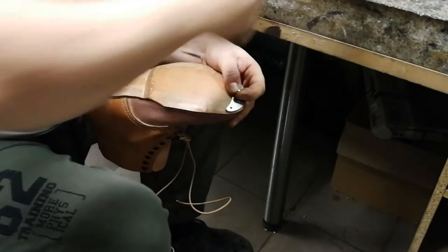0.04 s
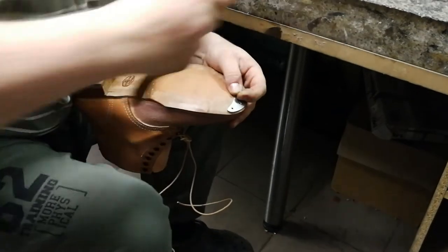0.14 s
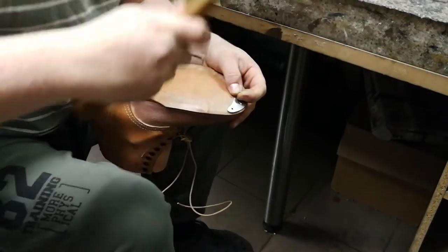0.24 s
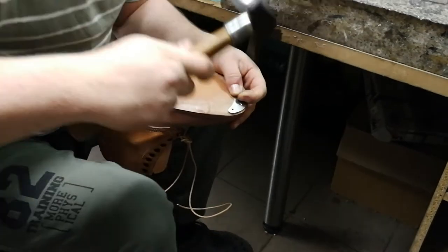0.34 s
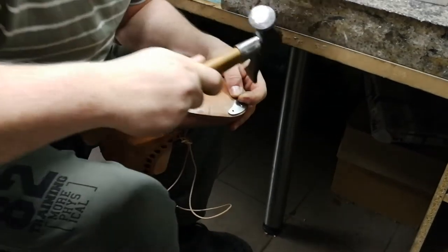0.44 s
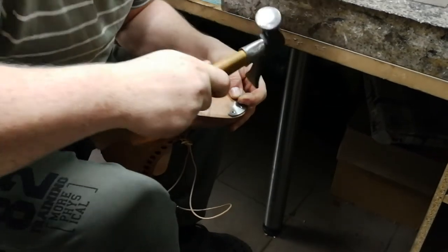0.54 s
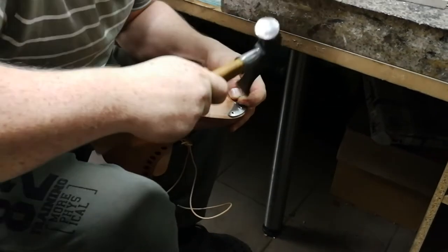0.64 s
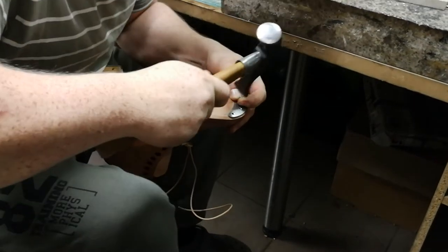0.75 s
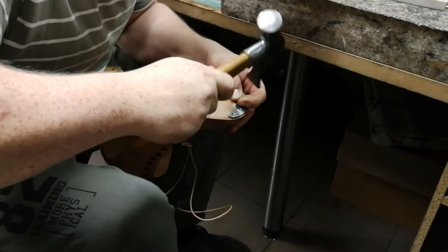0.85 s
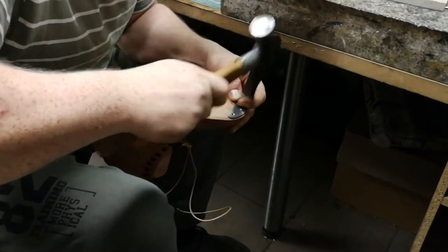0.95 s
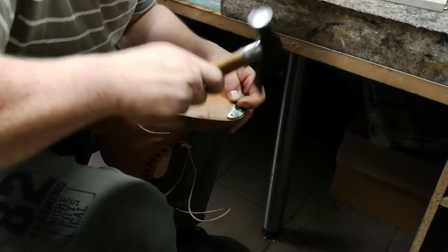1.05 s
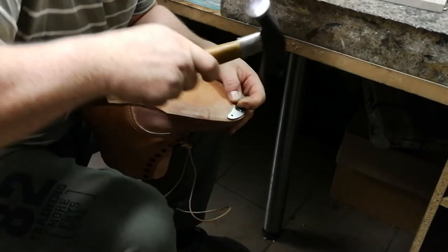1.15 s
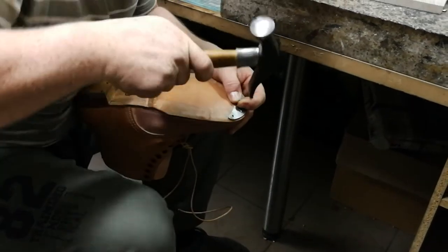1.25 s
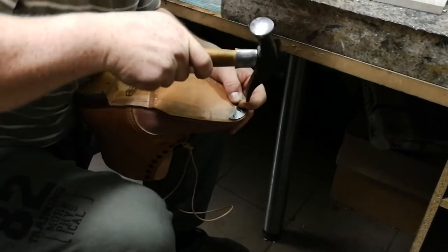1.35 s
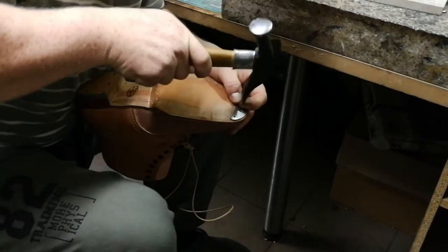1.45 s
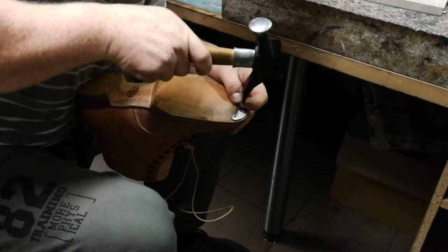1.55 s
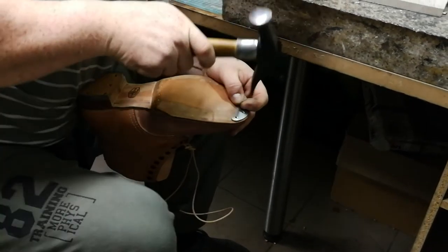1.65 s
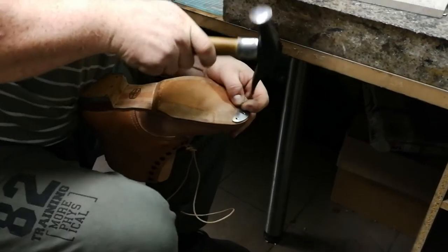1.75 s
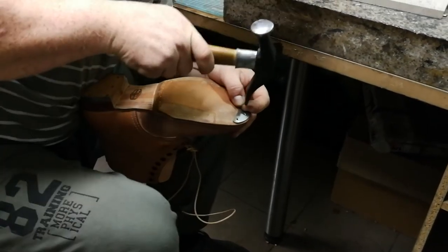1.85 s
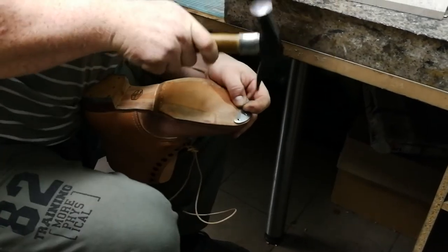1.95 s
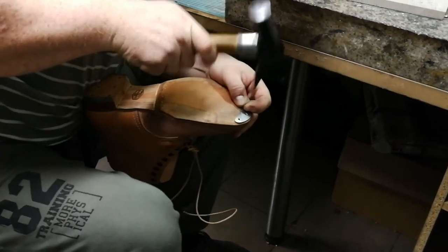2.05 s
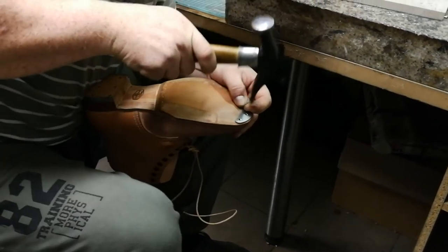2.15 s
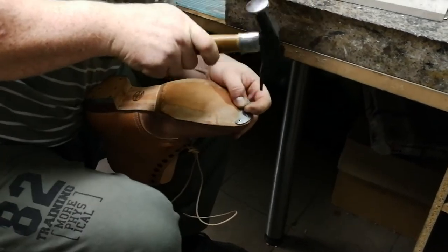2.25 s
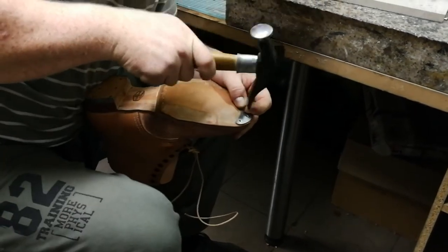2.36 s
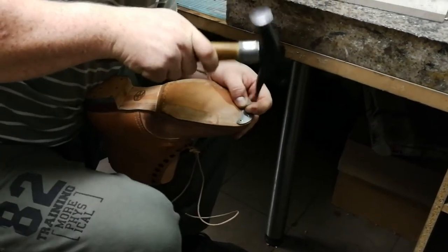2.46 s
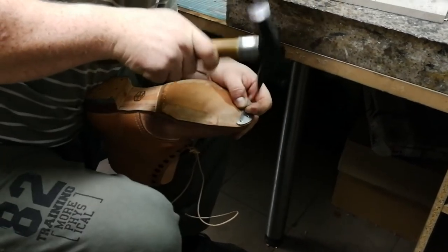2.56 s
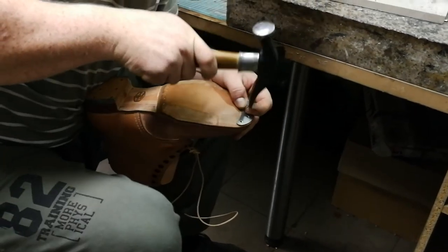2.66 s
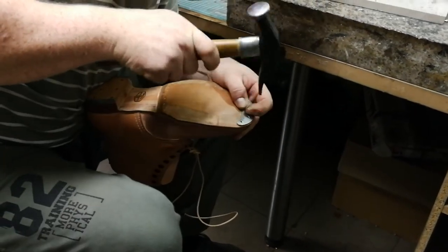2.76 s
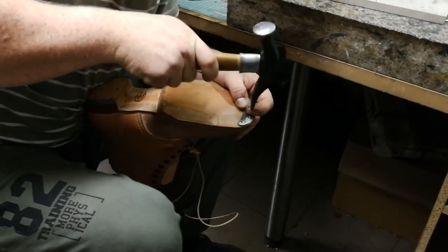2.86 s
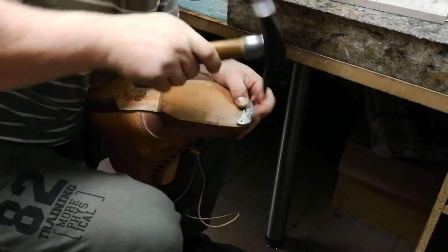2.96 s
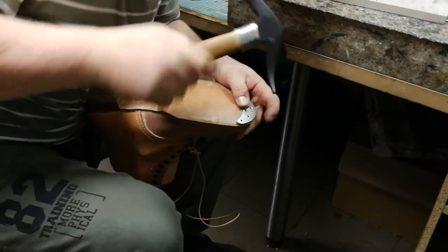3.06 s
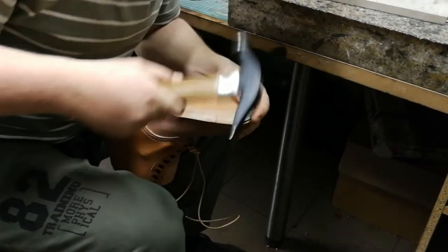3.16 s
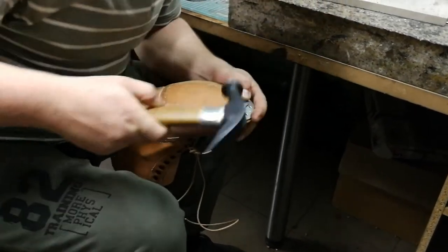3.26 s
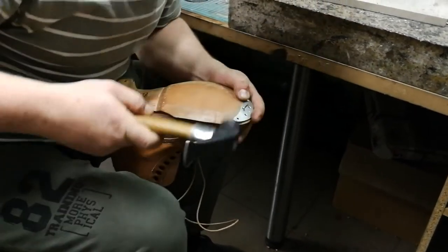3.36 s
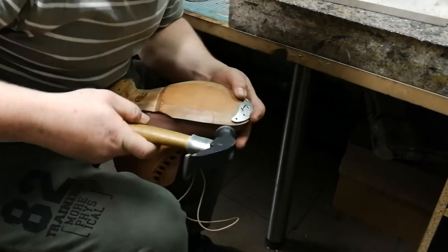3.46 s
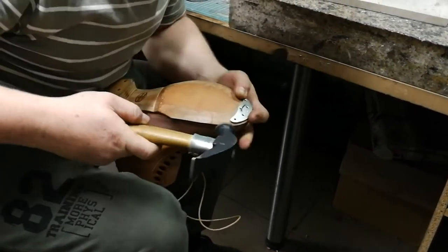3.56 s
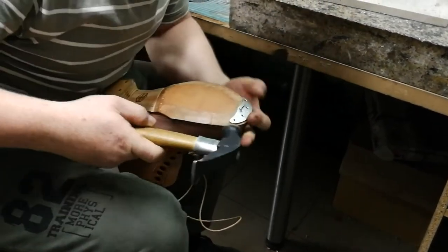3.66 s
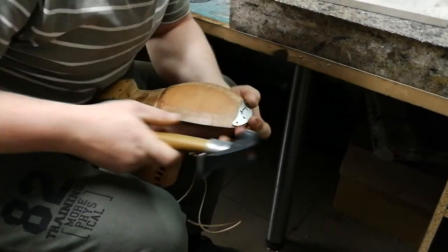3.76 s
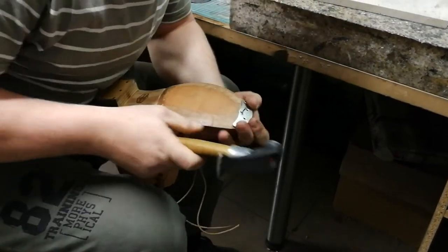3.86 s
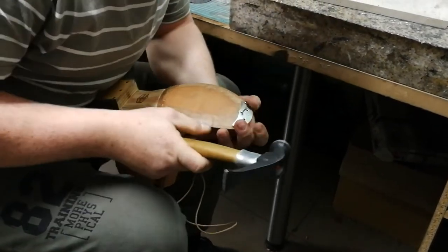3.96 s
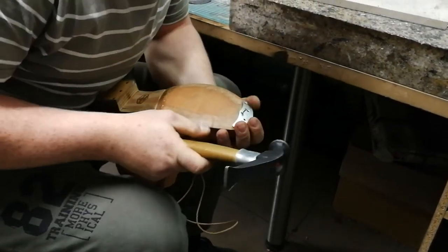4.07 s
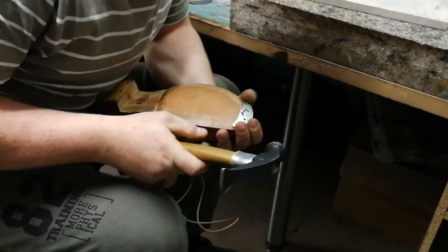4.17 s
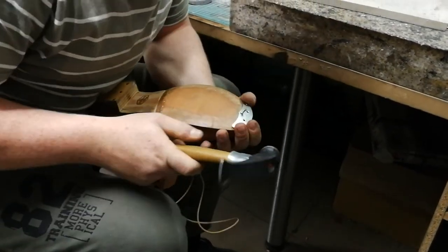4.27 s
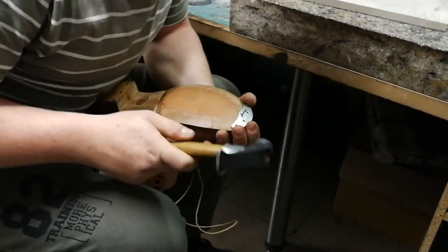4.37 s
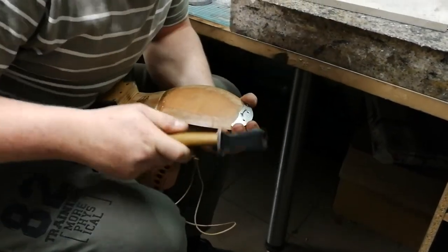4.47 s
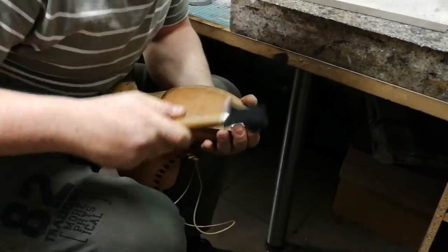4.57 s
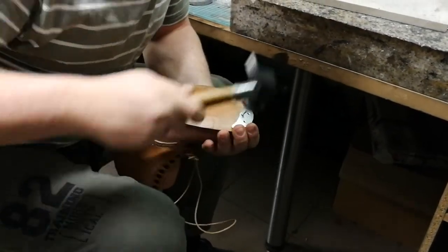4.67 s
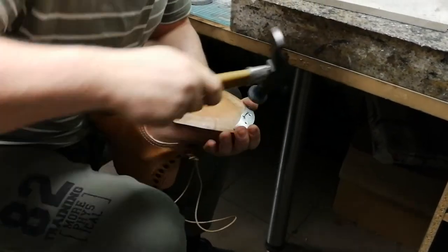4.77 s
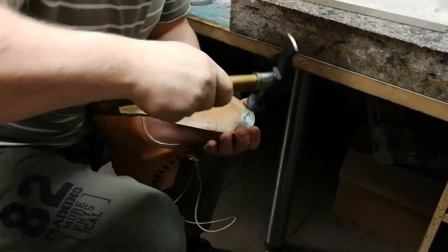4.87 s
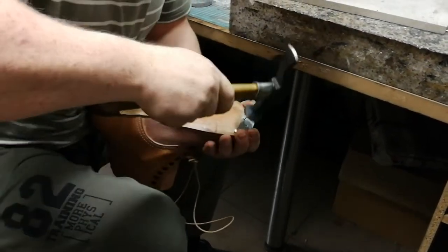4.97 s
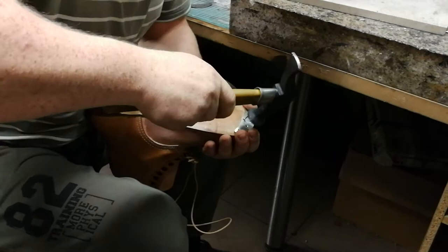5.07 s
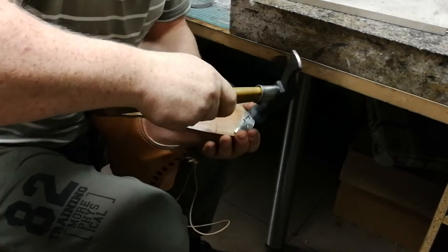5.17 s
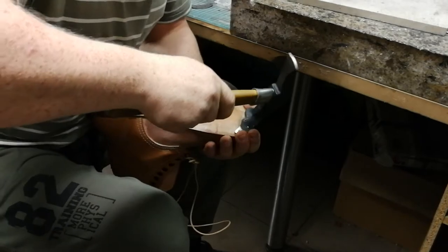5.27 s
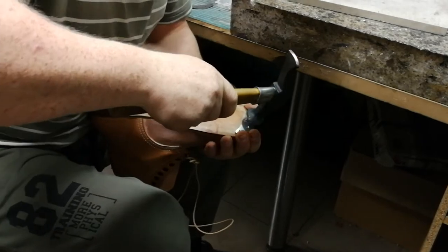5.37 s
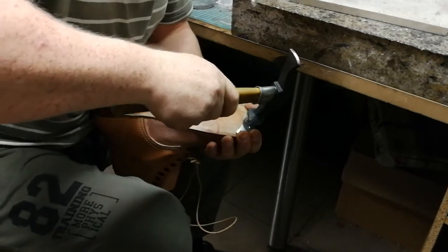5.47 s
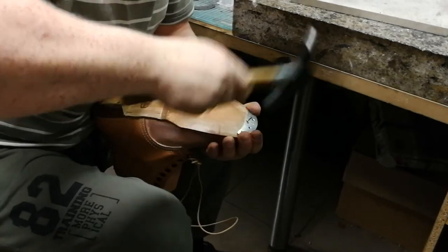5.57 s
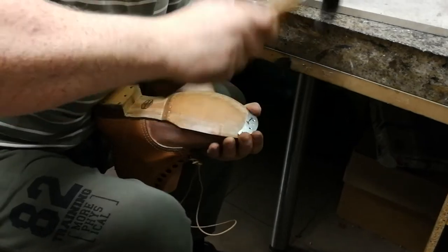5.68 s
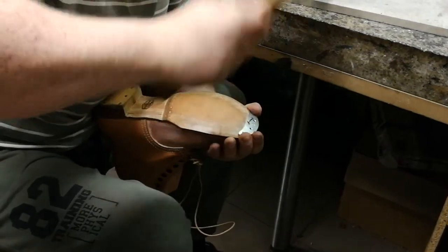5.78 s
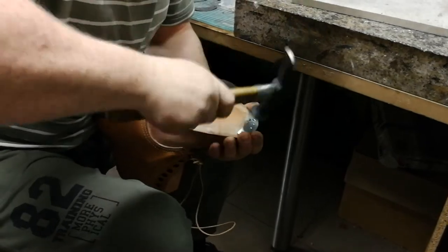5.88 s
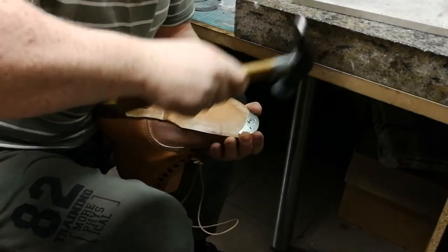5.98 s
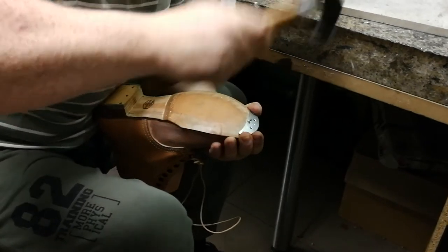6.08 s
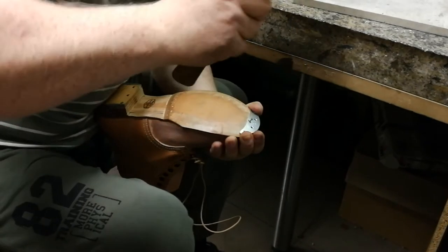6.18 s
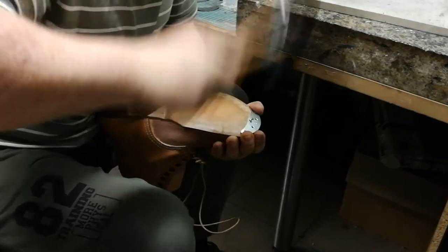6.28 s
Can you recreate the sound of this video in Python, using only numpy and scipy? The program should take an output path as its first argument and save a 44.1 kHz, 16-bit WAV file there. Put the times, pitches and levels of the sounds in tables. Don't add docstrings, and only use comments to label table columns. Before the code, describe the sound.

The fading ring of an earlier hammer blow, soft cloth rustle and faint finger ticks, then a small ping on a nail and five evenly spaced taps growing louder. Dull handle knocks and a brief steel scrape follow, with quiet boot handling. A glancing blow rings brightly, then two heavy cracks land. Close phone pickup, small room with short dense tail, low hum and hiss.

```python
import sys
import numpy as np
from scipy import signal
from scipy.fft import rfft, irfft, next_fast_len
from scipy.io import wavfile
from scipy.ndimage import uniform_filter1d

SR = 44100
rng = np.random.default_rng(int(sys.argv[2]) if len(sys.argv) > 2 else 0)


def to_wav(sig):
    pcm = np.clip(np.atleast_2d(sig), -1, 1) * 32767
    pcm = np.round(pcm).astype(np.int16)
    wavfile.write(sys.argv[1], SR, pcm.T)


def voltage_ratio(decibels):
    exponent = np.asarray(decibels, float) / 20
    return 10 ** exponent


N = 279594
LEAD = SR // 4
T = np.arange(SR // 2) / SR

# (frequency [Hz], level [dB per Hz])
AIR_COLOUR = [(12, -29), (34, 5), (55, -4), (100, -5), (184, -0.5), (251, -7.5), (351, -12), (404, -23.5),
              (863, -22.5), (1110, -19.5), (1850, -22), (4050, -26), (9150, -29), (15200, -32.5),
              (16500, -38.5)]
# (frequency [Hz], likeness [0-1])
EAR_LIKENESS = [(60, 0.97), (130, 1), (290, 0.8), (640, 0), (15000, 0)]
# (frequency [Hz], t60 [s], level [dB])
ROOM = [(97, .4, -10), (300, .3, -5), (1000, .28, -8.5), (3000, .29, -4), (6700, .27, -8), (9400, .24, -7),
        (12300, .2, -8), (15000, .1, -18)]

# (frequency [Hz], level [dB])
RUSTLE_COLOUR = [(300, -8), (1200, 4), (2500, -1), (5000, -0.5), (8000, 1), (11000, -6), (15000, -16)]
# (time [s], held [s], level [dB])
MOVES = [(.13, 0.011, -68.5), (.93, 0.16, -74), (3.1, 0.11, -72), (3.6, 0.28, -74.5), (4.2, .16, -76.5),
         (4.42, 0.044, -71), (4.88, .01, -72), (5.35, 0.0091, -77.5), (5.52, .01, -79), (6.02, 0.0046, -74)]
# (frequency [Hz], width [Hz], level [dB])
SQUEAK_BANDS = [(4860, 160, 4), (7040, 1200, -3.5), (3840, 750, -6)]
# (time [s], held [s], level [dB])
SLIDE = [(2.912, 0.057, -67)]

# (time [s], crack [dB], thump [dB], hammer ring [dB], left minus right [dB])
EARLIER_BLOW = [
    (-0.025, -24, -78, -35, 0),
]
PINGS = [
    (1.3145, -44, -46.5, -49, -0.55),
]
TAPS = [
    (1.646, -29, -36.5, -76, 0),
    (1.9298, -14, -31.5, -80, 2),
    (2.1833, -13, -29, -63, 0.5),
    (2.4347, -7, -25.5, -66.5, -4),
    (2.6615, -7, -24.5, -53, -3),
]
GLANCES = [
    (5.082, -15, -29, -70.5, -3),
]
REBOUNDS = [
    (5.0878, -16, -65, -12, 5.5),
]
BLOWS = [
    (5.691, 0, -18.5, -32, 0.1),
    (6.1513, -0.5, -41, -43, -2),
    (6.1526, 6, -22, -63, -3),
]

# (time [s], tick [dB], thump [dB], knock [dB])
HANDLING = [(0.1594, -69, -83, -82), (0.236, -60.5, -79, -86), (0.5494, -67, -76, -70),
            (0.8081, -60.5, -63.5, -65.5), (1.7434, -75, -59, -94), (3.0482, -65, -70, -70.5),
            (3.4045, -65.5, -66.5, -73), (3.4425, -70, -57.5, -53.5), (3.586, -53, -56.5, -52.5),
            (3.8185, -72, -68, -75), (3.9201, -74, -74, -70.5), (4.0285, -70, -70, -61),
            (4.1088, -62.5, -70, -69), (4.309, -61, -79, -79), (4.3782, -42.5, -76.5, -65)]
TICKS = [
    (1.283, -65, -79, -82),
    (3.572, -62, -89, -93),
    (6.022, -63.5, -77, -93),
]
HANDLE_KNOCKS = [
    (2.873, -79, -61, -50.5),
    (2.885, -72, -78, -52),
    (2.908, -65, -65, -59.5),
    (2.932, -63, -67, -57.5),
]
SETTLES = [
    (4.7447, -73.5, -61.5, -77),
    (4.7652, -71.5, -63, -69.5),
]

# (frequency [Hz], level [dB], t60 [s])
SOLE_MODES = [(190, -10, .05), (255, -3, .06), (310, -9, .05), (355, 5, .09), (428, -4, .2), (506, -4, .09),
              (608, -11, .05)]
TOE_MODES = [(240, -11, .08), (301, -7, .1), (334, 4, .08), (420, -6, .16), (525, 0, .06), (700, -11, .05)]
BOOT_BOOM = [(96, -4, .24), (135, -9, .15), (176, -6, .3), (215, -4, .15)]
LAST_BOOM = [(70, -11, .4), (97, -9, .45), (176, -4, .36), (220, -10, .25), (354, -9, .55)]

HEAD_HZ = [4059, 4650, 6175, 6815, 6907, 7704, 10500, 13320]
# (level [dB], t60 [s])
FACE = [(-18, .035), (-40, .05), (-21, .08), (-10, .07), (0, .1), (-14, .22), (-9, .012), (-21, .18)]
PEEN = [(4, .04), (-20, .05), (-30, .1), (-20, .07), (-14, .1), (0, .11), (-12, .012), (-9, .15)]
CHEEK = [(-12, .04), (-14, .04), (-18, .1), (-7, .07), (-3, .1), (-9, .2), (-12, .012), (-9, .2)]
CLAW = [(-17, .15), (-18, .15), (-16, .1), (-8, .08), (1, .12), (0, .13), (-30, .012), (-30, .2)]

# (frequency [Hz], level [dB per Hz])
NAIL_KNOCK = [(350, -33.5), (600, -3), (875, 0.5), (1160, -4.5), (1680, -3), (1810, 0), (2140, -13.5),
              (2400, -7.5), (3000, -23.5), (3900, -28), (6600, -120)]
NAIL_TIP_KNOCK = [(400, -26), (680, -4), (790, 12.5), (900, -9), (1200, -8), (1550, -4), (1750, -13),
                  (1980, -12.5), (2300, -21), (3000, -38)]
PLATE_KNOCK = [(350, -23.5), (550, -3.5), (1010, -8), (1230, -11), (1360, -2.5), (1860, -7.5), (2000, -9.5),
               (2500, -10), (3000, -21.5), (3900, -43), (6600, -120)]
LEATHER_KNOCK = [(260, -36), (450, -7.5), (809, -0.5), (994, -4.5), (1240, -9.5), (1750, -10),
                 (2230, -21.5), (2470, -15), (2600, -15), (3380, -69), (5720, -120)]
HANDLE_KNOCK = [(500, -11.5), (800, -5), (950, 3.5), (1150, -17.5), (1380, -6), (1430, -4), (1500, -15),
                (1700, -20.5), (1960, -6.5), (2200, -19), (3000, -36)]

# (frequency [Hz], level [dB per Hz])
NAIL_CRACK = [(1290, -38.5), (2200, -13), (2790, -12), (4430, -7.5), (6150, -12.5), (7100, -3.5),
              (9300, -6), (10000, -2), (11900, -19.5), (14400, -17.5), (16500, -36)]
PLATE_CRACK = [(1290, -13), (2200, -15.5), (3470, -7), (4000, -1), (5850, -6.5), (6980, -0.5), (8480, -4),
               (9070, -0.5), (11400, -15.5), (13700, -25), (16500, -47.5)]
GLANCE_CRACK = [(1500, -15), (2500, -17), (4000, -5), (5500, -12), (7500, -9.5), (10300, 6.5),
                (11500, -19.5), (15000, -28.5), (16500, -38.5)]
EARLY_CRACK = [(880, -63), (1500, -22), (2790, -10), (5870, -17), (7850, 3), (8170, -18), (9600, -4.5),
               (15500, -46), (16500, -41)]
TICK_CRACK = [(2000, -58), (3500, -13), (4600, 1.5), (6500, -6), (9000, 2.5), (11000, -11), (14000, -13),
              (16500, -82)]
PIN_CRACK = [(2000, -27), (3000, -13), (4800, 0), (5600, -18), (9000, -19), (11000, -7), (16500, -81)]


def along(table, hz, order=1):
    table = np.array(table)
    return np.interp(np.log(np.maximum(hz, 1)), np.log(table[:, 0]), table[:, order])


def unit(x):
    return x / np.sqrt(np.mean(x ** 2))


def coloured(x, table):
    size = x.shape[-1]
    return irfft(rfft(x) * voltage_ratio(along(table, np.fft.rfftfreq(size, 1 / SR))), size)


def flicker(rate):
    hold = int(SR / rate)
    levels = rng.standard_normal(N // hold + 1)
    return uniform_filter1d(np.repeat(levels, hold), hold)[:N]


def gestures(rows, swell_db_s, fade_db_s):
    t = np.arange(N) / SR
    s, held, db = np.array(rows).T[:, :, None]
    before = np.maximum(s - t, 0)
    after = np.maximum(t - s - held, 0)
    db = db - swell_db_s * before - fade_db_s * after
    return voltage_ratio(db.max(axis=0))


def air():
    share = np.clip(along(EAR_LIKENESS, np.fft.rfftfreq(N, 1 / SR)), 0, 1)
    mid, side = rfft(coloured(rng.standard_normal((2, N)), AIR_COLOUR))
    mid = irfft(mid, N)
    side = irfft(side * np.sqrt((1 - share) / (1 + share)), N)
    return np.array([mid + side, mid - side]) * voltage_ratio(-69) / np.std(mid)


def workshop(hits, gap_s=0.0044):
    bins = np.fft.rfftfreq(len(T), 1 / SR)
    share = np.clip(along(EAR_LIKENESS, bins), 0, 1)
    common, apart = rfft(rng.standard_normal((2, len(T))))
    noise = np.sqrt(1 + share) * common + np.sqrt(1 - share) * apart * np.array([[1], [-1]])
    tail = 0
    for hz in 50 * 2 ** np.arange(0, 9, .5):
        octave = np.maximum(0, 1 - 2 * np.abs(np.log2(bins / hz + 1e-9)))
        band = irfft(noise * octave, len(T))
        fall = np.exp(-np.log(1000) * T / along(ROOM, hz))
        fall *= 1 - np.exp(-(T / gap_s) ** 2)
        tail = tail + band * fall / np.sqrt(np.sum(fall ** 2)) * voltage_ratio(along(ROOM, hz, order=2))
    wet = signal.fftconvolve(hits[2:], tail)
    return (hits[:2] + wet[:, :hits.shape[1]])[:, LEAD:LEAD + N]


def rustle():
    patchy = voltage_ratio(2 * flicker(63))
    grains = rng.standard_normal((2, N))
    sizes = voltage_ratio(2 * np.minimum(rng.exponential(size=N), 4))
    cloth = unit(coloured(grains * sizes * patchy, RUSTLE_COLOUR))
    moving = gestures(MOVES, swell_db_s=146, fade_db_s=116.5)
    return cloth * np.hypot(voltage_ratio(-81), moving)


def scuff():
    bins = np.fft.rfftfreq(N, 1 / SR)
    drag = rfft(rng.standard_normal((2, N)) * voltage_ratio(2.1 * flicker(120)))
    shape = sum(voltage_ratio(db) / (1 + (2 * (bins - hz) / width) ** 2) for hz, width, db in SQUEAK_BANDS)
    return unit(irfft(drag * shape, N)) * gestures(SLIDE, swell_db_s=1804, fade_db_s=170)


def causal(table, size=1024):
    c = irfft(np.log(voltage_ratio(along(table, np.fft.rfftfreq(size, 1 / SR)))), size)
    c[1:size // 2] *= 2
    c[size // 2 + 1:] = 0
    h = irfft(np.exp(rfft(c)), size)
    return h / np.sqrt(np.sum(h ** 2))


def burst(colour, crack_s, rattle_s, rattle_db, alike):
    t, shape = T[:len(T) // 4], causal(colour)
    crack = np.exp(-(t / crack_s) ** 2)
    rattle = voltage_ratio(rattle_db) * np.exp(-t / rattle_s)
    swell = (1 - np.exp(-t / 0.0002)) * (crack + rattle)
    energy = np.sum(swell ** 2)
    grit = rng.standard_normal((3, len(t)))
    grit = (alike * grit[0] + np.sqrt(1 - alike ** 2) * grit[1:]) * swell
    near = signal.fftconvolve(grit, shape[None])[:, :len(t)]
    near *= np.sqrt(energy / np.sum(near ** 2, axis=1, keepdims=True))
    click = np.pad(shape, (0, len(t) - len(shape))) * np.sqrt(energy)
    return np.vstack([near, click])


def ring(modes, scatter_db, detune, rise_s, spread, wall_db):
    hz, db, t60 = np.array(modes).T[:, :, None]
    draw = rng.standard_normal((len(modes), 3))
    tones = np.exp(-np.log(1000) * T / t60) * (1 - np.exp(-T / rise_s))
    tones = tones * voltage_ratio(db + scatter_db * draw[:, :1])
    tones = tones * (-1.) ** np.arange(len(modes))[:, None]
    turn = 2 * np.pi * hz * (1 + detune * draw[:, 1:2]) * T
    apart = np.minimum(hz / 400, 1) ** 2 * np.sign(draw[:, 2:3]) * spread
    heard = np.array([np.sum(tones * np.sin(turn + side * apart), axis=0) for side in (1, -1, 0)])
    return heard * voltage_ratio(np.array([[0], [0], [wall_db]]))


def hammer(rows, knock_db):
    return [(s, crack, sole, crack + knock_db, head, pan) for s, crack, sole, head, pan in rows]


def touch(rows, pan_db):
    return [(*row, -np.inf, pan_db) for row in rows]


def strikes(events, sole, body, head, boom, colour, crack_s, rattle_db, knock_s, boom_db):
    out = np.zeros((3, N + LEAD + len(T)))
    steel = [(hz, db, t60) for hz, (db, t60) in zip(HEAD_HZ, head)]
    for s, crack_db, sole_db, knock_db, head_db, pan_db in events:
        hit = voltage_ratio(sole_db + 1) * ring(sole, scatter_db=1, detune=.008, rise_s=.0015, spread=.5, wall_db=-5)
        hit += voltage_ratio(sole_db + boom_db) * ring(boom, scatter_db=2.5, detune=.025, rise_s=.018,
                                             spread=.35, wall_db=-4)
        if head_db > -85:
            hit += voltage_ratio(head_db) * ring(steel, scatter_db=.3, detune=.0003, rise_s=.0003,
                                       spread=.6, wall_db=-6)
        contact = voltage_ratio(crack_db - 9.5) * burst(colour, crack_s, rattle_s=0.0081, rattle_db=rattle_db, alike=1.0)
        contact += voltage_ratio(knock_db - 0.5) * burst(body, knock_s, rattle_s=0.018, rattle_db=-5, alike=0.7)
        hit[:, :contact.shape[1]] += contact
        at = int((s + .001) * SR) + LEAD
        out[:, at:at + len(T)] += hit * voltage_ratio(np.array([[pan_db], [-pan_db], [0]]) / 2)
    return out


def hands():
    hits = strikes(touch(HANDLING, pan_db=0.3), SOLE_MODES, LEATHER_KNOCK, FACE, BOOT_BOOM, TICK_CRACK,
                   crack_s=0.004, rattle_db=-5.0, knock_s=0.0038, boom_db=-11.5)
    hits += strikes(touch(TICKS, pan_db=-6.0), SOLE_MODES, LEATHER_KNOCK, FACE, BOOT_BOOM, PIN_CRACK,
                    crack_s=0.0018, rattle_db=10.0, knock_s=0.012, boom_db=-24)
    hits += strikes(touch(HANDLE_KNOCKS, pan_db=-0.5), SOLE_MODES, HANDLE_KNOCK, FACE, BOOT_BOOM, TICK_CRACK,
                    crack_s=0.0026, rattle_db=5, knock_s=0.0084, boom_db=-38)
    hits += strikes(touch(SETTLES, pan_db=0.0), SOLE_MODES, LEATHER_KNOCK, FACE, BOOT_BOOM, TICK_CRACK,
                    crack_s=.003, rattle_db=-11.5, knock_s=0.0028, boom_db=2.5)
    return hits


def hammering():
    hits = strikes(hammer(EARLIER_BLOW, knock_db=-65), SOLE_MODES, PLATE_KNOCK, CLAW, BOOT_BOOM, EARLY_CRACK,
                   crack_s=0.005, rattle_db=-19, knock_s=.006, boom_db=-21)
    hits += strikes(hammer(PINGS, knock_db=-4), SOLE_MODES, NAIL_TIP_KNOCK, PEEN, BOOT_BOOM, NAIL_CRACK,
                    crack_s=0.0039, rattle_db=-0.5, knock_s=0.0068, boom_db=-12)
    hits += strikes(hammer(TAPS, knock_db=-16.0), SOLE_MODES, NAIL_KNOCK, FACE, BOOT_BOOM, NAIL_CRACK,
                    crack_s=0.00093, rattle_db=-8.0, knock_s=0.0017, boom_db=-3.5)
    hits += strikes(hammer(GLANCES, knock_db=-17), TOE_MODES, PLATE_KNOCK, FACE, LAST_BOOM, GLANCE_CRACK,
                    crack_s=.0015, rattle_db=-12, knock_s=0.0022, boom_db=-16.0)
    hits += strikes(hammer(REBOUNDS, knock_db=-33), TOE_MODES, PLATE_KNOCK, FACE, LAST_BOOM, GLANCE_CRACK,
                    crack_s=.0015, rattle_db=-6, knock_s=.003, boom_db=-21.0)
    hits += strikes(hammer(BLOWS, knock_db=-17.5), TOE_MODES, PLATE_KNOCK, CHEEK, LAST_BOOM, PLATE_CRACK,
                    crack_s=0.001, rattle_db=-11.5, knock_s=0.0013, boom_db=-14)
    return hits


def scene():
    hits = hands() + hammering()
    size = next_fast_len(hits.shape[1])
    late = np.exp(-2j * np.pi * np.fft.rfftfreq(size, 1 / SR) * 1.6e-5)
    hits[1] = irfft(rfft(hits[1], size) * late, size)[:hits.shape[1]]
    hits = signal.sosfilt(signal.butter(N=2, Wn=75, btype="high", fs=SR, output="sos"), hits)
    return air() + rustle() + scuff() + workshop(hits)


def band_limit(x):
    return signal.sosfilt(signal.butter(12, 16820, fs=SR, output="sos"), x)


def record(dry):
    rounded = np.tanh(dry)
    mix = signal.sosfilt(signal.butter(N=4, Wn=15800, fs=SR, output="sos"), rounded)
    return band_limit(mix)


dry = scene()
out = record(dry)
to_wav(out)
```